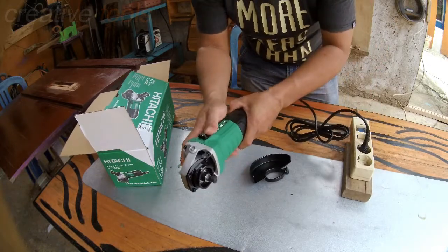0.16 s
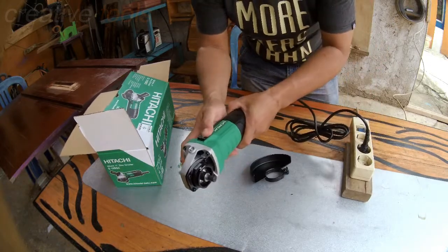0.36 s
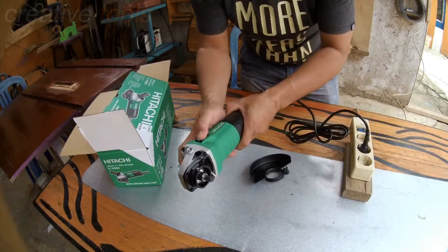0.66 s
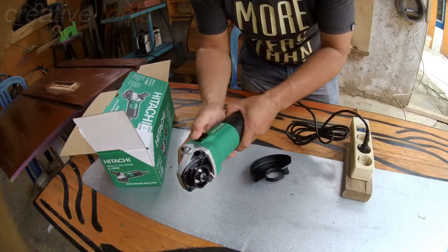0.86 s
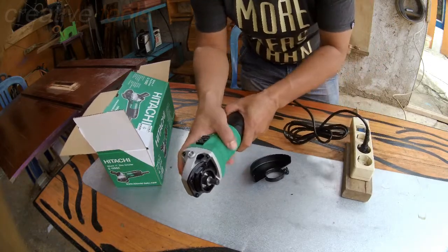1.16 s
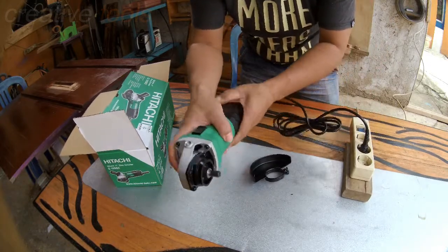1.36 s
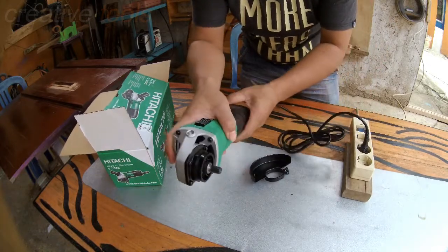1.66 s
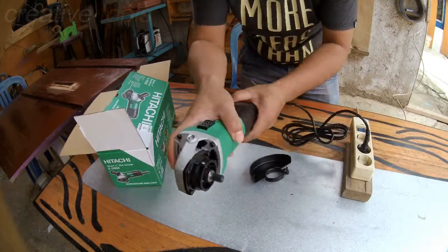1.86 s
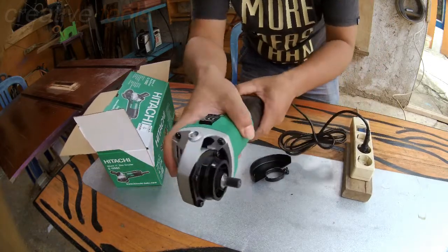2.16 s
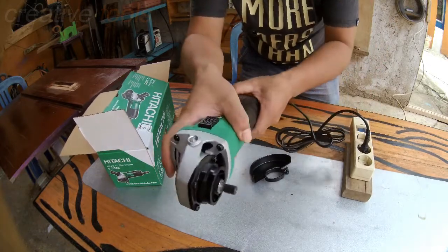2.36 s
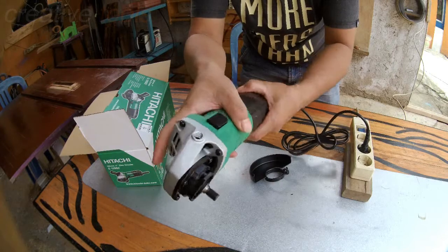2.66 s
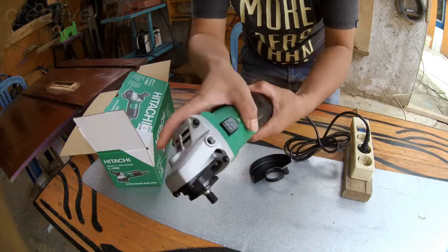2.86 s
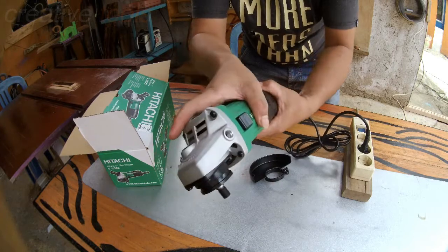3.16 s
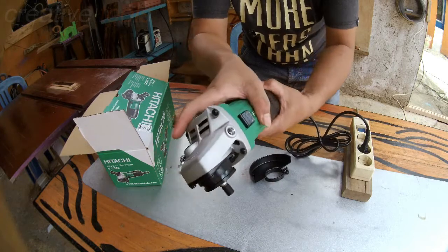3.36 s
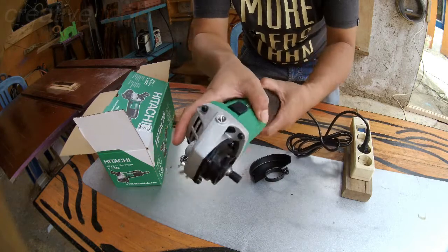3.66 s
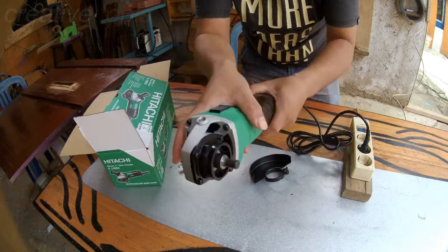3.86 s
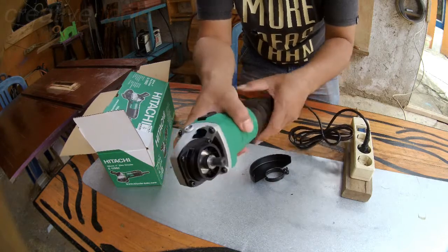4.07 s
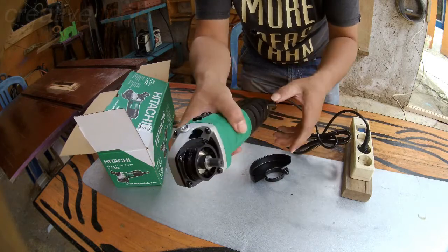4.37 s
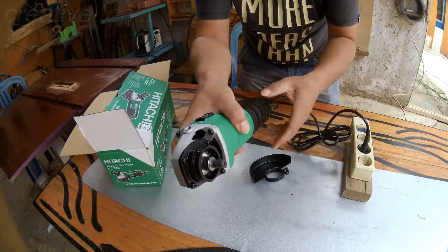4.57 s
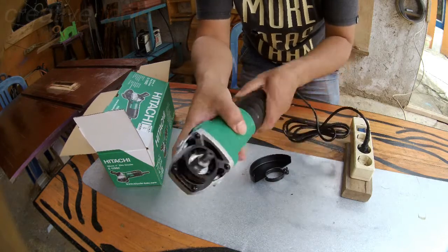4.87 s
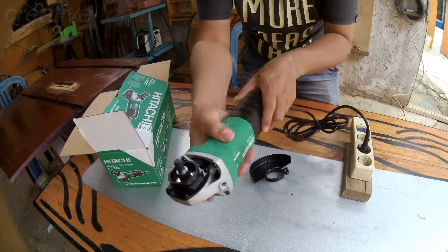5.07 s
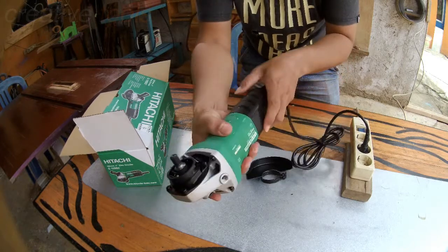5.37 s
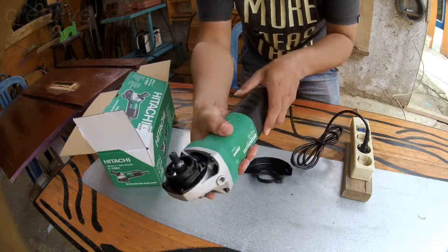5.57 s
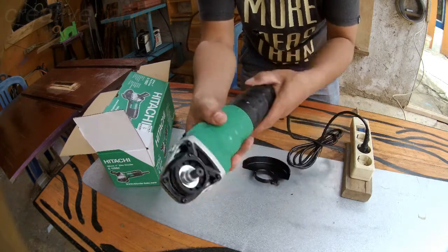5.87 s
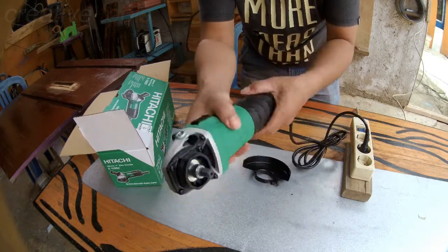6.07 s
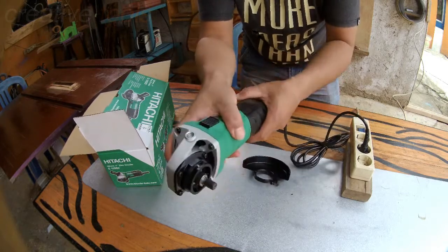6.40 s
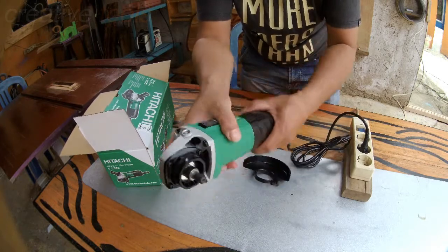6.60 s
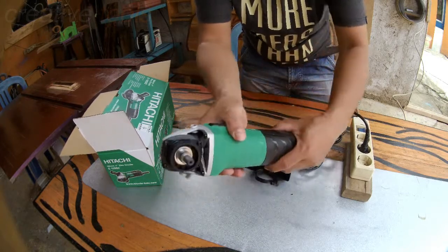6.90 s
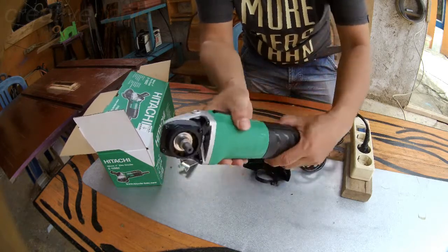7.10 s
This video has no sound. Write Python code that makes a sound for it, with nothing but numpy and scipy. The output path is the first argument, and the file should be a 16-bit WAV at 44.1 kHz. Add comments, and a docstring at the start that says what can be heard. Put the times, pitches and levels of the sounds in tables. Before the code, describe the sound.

A small electric angle grinder is switched on close to the microphone, with a click and a sharp gear rattle against a faint outdoor rumble. Its pitch rises, then holds as a mix of rushing fan, hum, hiss and thin whistle. As the tool is turned, the hiss sweeps and sometimes rings. Later, gusts from its vents thump on the microphone and briefly push down the continuing whine.

```python
"""Over a faint outdoor rumble a slide switch clicks, starting a small angle grinder with no disc close to one
microphone. The gears clash in time with the mains. As the motor speeds up, the fan rushes, the shaft
hums, gears and brushes hiss and the commutator whistles. The tool is turned in the hands over a table,
so reflections sweep the hiss and the hollow gear head rings at moments. From about 3 s the vents face
the microphone at times: cooling air buffets it and the gain ducks."""
import sys
import numpy as np
from scipy import signal
from scipy.fft import rfft, irfft
from scipy.io import wavfile
from scipy.ndimage import uniform_filter1d, map_coordinates

SR = 44100
rng = np.random.default_rng(int(sys.argv[2]) if len(sys.argv) > 2 else 0)


def persist_wave(psi):
    """Save psi, clipped to +-1, as 16-bit WAV."""
    counts = np.round(np.clip(psi, -1, 1) * 32767).astype(np.int16)
    wavfile.write(sys.argv[1], SR, np.atleast_2d(counts).T)


N = 319284
T = np.arange(N) / SR
ON_S, MAINS_HZ = .273, 50
FREE_HZ, SLOTS, BARS = 596.8, 12, 24  # armature: free-running rate, slots, commutator bars
HOLDER_HZ, HOLDER_WIDTH_HZ = 13550, 920  # resonance of the brush holders

# outdoor rumble spectrum (frequency [Hz], relative level [dB])
RUMBLE_SPECTRUM = [(18, -36), (30, -1), (65, 2.5), (211, -10), (337, -9), (404, -13), (538, -4.5),
                   (581, -26), (629, -7), (735, -3), (837, -19.5), (7240, -29.5), (15000, -35)]
# partials of a far hum (frequency [Hz], level before the dip [dB])
FAR_HUM = [(339, -53.5), (452, -70), (754, -83)]
# ticks of the slide switch (time [s], level [dB], decay time [s])
SWITCH_TICKS = [(0.115, -38.5, 0.0037), (0.243, -42, 0.0011), (.273, -17, 0.0034)]
# impact spectrum of gear teeth and switch (frequency [Hz], relative level [dB])
IMPACT_SPECTRUM = [(80, -30), (300, -24), (620, -10.5), (800, -15), (1230, -5.5), (1900, -12.5), (3100, -5),
                   (4400, 2.5), (5100, 2), (6200, -0.5), (7900, -12), (9200, -15), (12000, -29),
                   (15000, -30)]
# drift of the rotation rate (time [s], offset [Hz])
SPEED_DRIFT = [(2.4, 0), (3.1, 2), (4.1, 1.5), (5, -2), (5.4, -.3), (6.8, -.5), (7.2, -1.5)]
# modes of the cast gear head (frequency [Hz], bandwidth [Hz], relative level [dB])
HEAD_MODES = [(3600, 120, -2), (4070, 57, 3.5), (4490, 190, 3.5), (4760, 100, 7), (5100, 160, 6),
              (6440, 120, -16), (7670, 280, -17), (8850, 160, -6)]
# surges of gear clash while the motor pulls hard (start [s], end [s], relative level [dB])
CLASH_SURGES = [(.291, .318, -4), (.44, .465, -14.5)]
# relative levels sent to the microphone (time [s], fan [dB], gear case [dB], vents [dB], brushes [dB])
RADIATION = [(.55, -34, -19.5, -19.5, -18), (1.1, -35.5, -22, -21.5, -19), (2.6, -37, -22, -22.5, -18.5),
             (2.88, -31.5, -24, -23.5, -22.5), (3.13, -30.5, -21.5, -20, -22),
             (3.36, -28.5, -18.5, -16.5, -21), (3.68, -28, -21, -19, -23), (3.87, -31.5, -21, -17.5, -20),
             (4.0, -33, -23, -22, -21.5), (4.13, -29.5, -22, -21.5, -20), (4.85, -27.5, -20.5, -21.5, -19),
             (5.25, -26.5, -23.5, -23, -20.5), (5.75, -27.5, -22.5, -23, -19), (5.9, -27, -20.5, -24, -19),
             (6.3, -26, -21.5, -23, -19), (6.8, -27.5, -22, -24.5, -19), (7.0, -26, -19.7, -21, -20),
             (7.24, -28.5, -20.5, -20, -20.5)]
# spectra of those four sources (frequency [Hz], relative level [dB])
FAN_SPECTRUM = [(120, -28), (200, -23), (345, -20), (489, -14), (555, -15.5), (588, -10.5), (914, -11.5),
                (1090, -4), (1170, -4.5), (1470, -6.5), (1730, -4.5), (2720, -13), (3200, -13.5),
                (4160, -15), (7040, -120)]
GEAR_SPECTRUM = [(1410, -71), (2400, -14), (3000, -8), (3510, -4.5), (4250, -3.5), (4880, -0.5),
                 (6000, -5.5), (7800, -32), (13200, -120)]
VENT_SPECTRUM = [(3410, -30), (5800, 0), (7110, -1), (8040, 3.5), (8780, -7), (9300, -11.5), (12100, -41),
                 (20500, -120)]
BRUSH_SPECTRUM = [(6000, -10), (9000, -8), (9600, -4), (10300, 0.5), (11500, 1.5), (12000, 1.5),
                  (12500, -2.5), (13000, -12), (13600, -8), (14300, -19), (15300, -12.5), (16000, -25)]
# squeals of the brush holders (start [s], end [s], relative level [dB])
HOLDER_SQUEALS = [(3.82, 3.88, -29), (5.87, 5.94, -30), (6.7, 6.77, -28)]
# delays of the reflections (time [s], hands [ms], table [ms])
ECHO_DELAYS = [(1.05, 0.54, 0.46), (1.45, 0.45, 1.53), (2.05, .41, 1.54), (2.65, 0.38, .6),
               (3.2, 0.32, .68), (3.8, .32, 0.75), (4.05, 0.21, .6), (4.6, .2, 1.23), (5.7, 0.25, 0.78),
               (6.05, 0.2, 1.2), (6.25, .41, 0.96), (6.85, .31, .75)]
# base levels of the shaft tones (time [s], first order [dB], second order [dB], commutator [dB])
TONE_LEVELS = [(.38, -41, -41, -19), (.52, -52, -66, -22), (.85, -53.5, -55, -37), (1.4, -52.5, -46.5, -34),
               (2.0, -50, -44.5, -44), (2.5, -51, -60, -46), (3.1, -40, -55, -36), (3.8, -44.5, -58, -43),
               (4.15, -41.5, -39, -37), (4.8, -42, -39, -33), (5.1, -51, -35.5, -41),
               (5.45, -40.5, -32.5, -42), (5.8, -48, -37.5, -44), (6.2, -37.5, -36, -41),
               (6.65, -36.5, -35, -41), (6.82, -38, -37, -28), (7.0, -38, -32, -42)]
# narrow peak in the treble hiss (time [s], centre frequency [Hz], level [dB])
PEAK_PATH = [(.3, 11100, -30), (.65, 11250, -27), (1.3, 11200, -31), (2.1, 10550, -29), (2.6, 10400, -40),
             (3.0, 10050, -27.5), (3.6, 10000, -40), (4.7, 10400, -30), (5.5, 10400, -36),
             (6.75, 10500, -31), (7.2, 10200, -37)]
# overtones of the gear head's hollow (frequency [Hz], bandwidth per stage [Hz], relative level [dB])
HOLLOW_MODES = [(8180, 590, -3), (12000, 470, 0)]
# moments when that hollow faces the microphone (start [s], end [s], level [dB])
HOLLOW_FACING = [(2.72, 2.8, -25), (3.68, 3.9, -35), (5.16, 5.72, -24), (6.42, 6.54, -27)]
# gusts of cooling air on the microphone (start [s], end [s], level [dB])
GUSTS = [(2.95, 3.75, -22.5), (4.12, 4.22, -32), (4.44, 4.94, -27.5), (5.99, 6.22, -39), (6.3, 6.63, -46.5)]
# strongest buffets in that air (time [s], level [dB])
AIR_BUFFETS = [(2.959, -15), (3.04, -12), (3.067, -8), (3.09, -9.5), (3.125, -14.5), (3.19, -19),
               (3.25, -13.5), (3.395, -17), (3.502, -17), (3.543, -21), (3.577, -10), (3.625, -10.5),
               (3.679, -8), (3.756, -12), (4.205, -23), (4.442, -17.5), (4.525, -22.5), (4.733, -18.5),
               (4.83, -25.5), (4.93, -21), (6.203, -25)]
# spectrum of the eddies (frequency [Hz], relative level [dB])
EDDY_SPECTRUM = [(12, -43), (20, -27), (54, 3), (97, 0), (201, -9.5), (248, -15.5), (558, -26), (604, -48),
                 (634, -25.5), (900, -36), (1170, -35), (1980, -120)]


def undb(db):
    """Decibels to amplitude ratio."""
    return 10 ** (np.asarray(db) / 20)


def unit(x):
    """Normalisation to rms 1."""
    return x / np.sqrt(np.mean(x ** 2))


def curves(table):
    """Linear interpolation of each column in time."""
    times, *columns = np.transpose(table)
    return [np.interp(T, times, column) for column in columns]


def spells(table, attack_s, release_s):
    """Power summation of (start, end, dB) envelopes that swell, hold and decay."""
    gains = [undb(db) * np.exp(-np.maximum(start - T, 0) / attack_s - np.maximum(T - end, 0) / release_s)
             for start, end, db in table]
    return np.sqrt(np.sum(np.square(gains), axis=0))


def colour(x, spectrum):
    """Spectral shaping by (Hz, dB) points, cut off beyond their ends; rms 1."""
    hz, db = np.transpose(spectrum)
    log_hz = np.log(np.maximum(np.fft.rfftfreq(N, 1 / SR), 1))
    gain = undb(np.interp(log_hz, np.log(hz), db, left=-120, right=-120))
    return unit(irfft(rfft(x) * gain, N))


def ring(x, hz, width):
    """Second-order resonance, gain 1 at its centre."""
    return signal.lfilter(*signal.iirpeak(hz, hz / width, fs=SR), x)


def lowpass(hz):
    """Second-order low-pass filter sections."""
    return signal.butter(2, hz, fs=SR, output="sos")


def walk(rate):
    """Smooth random modulation, rms 1."""
    hold = int(SR / rate)
    steps = np.repeat(rng.standard_normal(N // hold + 1), hold)
    return unit(uniform_filter1d(uniform_filter1d(steps, hold), hold)[:N])


def contacts(rate, spread_db):
    """Impact noise: dense short bursts, each with a random strength."""
    burst = np.cumsum(rng.random(N) < rate / SR)
    return unit(rng.standard_normal(N) * undb(spread_db * rng.standard_normal(N))[burst])


def outdoors():
    """Ambient noise: a rumble and a wavering far hum, sinking from just before the motor starts."""
    hum = sum(undb(db + 1.4 * walk(17)) * np.sqrt(2) * np.sin(2 * np.pi * hz * T + .8 * walk(17))
              for hz, db in FAR_HUM)
    rumble = colour(rng.standard_normal(N), RUMBLE_SPECTRUM) * undb(-41.5)
    dip_db = np.interp(T, [.248, .262, .6], [0, -13, -19])
    return (rumble + hum) * undb(dip_db)


def switch():
    """Damped impacts: the plastic slider ticks as it moves and snaps home."""
    ticks = sum(undb(db) * np.exp(-np.abs(T - s) / decay) * (T > s) for s, db, decay in SWITCH_TICKS)
    return colour(rng.standard_normal(N), IMPACT_SPECTRUM) * ticks


def armature_hz():
    """Exponential approach to the free-running rate, in a quick and a slow stage, with slight drift."""
    since_on = np.maximum(T - ON_S, 0)
    shortfall_hz = 156.4 * np.exp(-since_on / .1536) + 229.7 * np.exp(-since_on / .4683)
    return FREE_HZ - shortfall_hz + curves(SPEED_DRIFT)[0]


def gear_head(x, modes_db):
    """Forced vibration: the metal head adds its modes to whatever shakes it."""
    return unit(x + undb(modes_db) * sum(undb(db) * ring(x, hz, width) for hz, width, db in HEAD_MODES))


def gear_clash(turns, current):
    """Amplitude modulation: inrush torque throws the teeth together on every half wave of the mains."""
    rattle = gear_head(colour(contacts(rate=2500, spread_db=1), IMPACT_SPECTRUM), modes_db=-3.5)
    whine = undb(-10.5 + 1.9 * walk(55)) * np.sin(2 * np.pi * SLOTS * turns + walk(158))
    whine *= np.interp(T, [.295, .335], [.2, 1])  # emerges once the teeth stop bouncing
    throb = np.interp(T, [.33, .39], [.42, .14])  # the current falls as the armature picks up speed
    surges = spells(CLASH_SURGES, attack_s=.009, release_s=.075)
    return (rattle + whine) * (1 + throb * current) * surges


def bars_match(speed, hz, width_hz):
    """Frequency coincidence of the commutator bar rate with a resonance, 0 to 1."""
    return np.exp(-((BARS * FREE_HZ * speed - hz) / width_hz) ** 2)


def holder_boost_db(speed):
    """Resonant gain as the bar rate meets the brush holders' own frequency."""
    return 3.5 * bars_match(speed, HOLDER_HZ, width_hz=500)


def running_hiss(speed, current):
    """Turbulence, impact and friction: fan, vents, gears and brushes grow louder with speed."""
    fan_db, gear_db, vent_db, brush_db = curves(RADIATION)
    sing_db = brush_db - 12.5 + holder_boost_db(speed) + walk(10)
    fan = colour(rng.standard_normal(N), FAN_SPECTRUM) * undb(fan_db + .5 * walk(25.05))
    gears = gear_head(colour(contacts(rate=1900, spread_db=-.8), GEAR_SPECTRUM), modes_db=-11)
    gears *= undb(gear_db + .08)
    vents = gear_head(colour(contacts(rate=1500, spread_db=1), VENT_SPECTRUM), modes_db=-15)
    vents *= undb(vent_db + .71 * walk(12))
    brushes = colour(contacts(rate=1900, spread_db=.4), BRUSH_SPECTRUM) * undb(brush_db - .5)
    holders = ring(ring(rng.standard_normal(N), HOLDER_HZ, HOLDER_WIDTH_HZ), HOLDER_HZ, HOLDER_WIDTH_HZ)
    holders = unit(holders) * np.hypot(undb(sing_db), spells(HOLDER_SQUEALS, .04, .04))
    # the armature shakes in its play
    chatter = undb(.66 * walk(70) + .33 * walk(600)) * (1 + .012 * current)
    return (fan + (gears + vents + brushes + holders) * chatter) * speed ** .64


def reflections(x):
    """Comb filtering: echoes off hands and table interfere, and the notches sweep as the tool turns."""
    hands_ms, table_ms = curves(ECHO_DELAYS)
    delayed = lambda ms: map_coordinates(x, [np.arange(N) - ms * SR / 1000], order=3)
    hands_db = np.interp(T, [1.05, 4.05], [0, 0]) + np.interp(hands_ms, [.2, .45], [-13, -21])
    return x + undb(hands_db) * delayed(hands_ms) + undb(-26) * delayed(table_ms)


def shaft_tones(turns, speed):
    """Harmonics of rotation: unbalance hums at two orders; slots and commutator bars whistle above."""
    first_db, second_db, bars_db = curves(TONE_LEVELS)
    angle = 2 * np.pi * turns + .035 * walk(25)
    angle += np.minimum(.2 * (1 - speed), .04) * walk(1200)  # the shaft judders until it is up to speed
    order = lambda n: np.sqrt(2) * np.sin(n * angle)
    hum = undb(first_db + 1.06 * walk(23)) * order(1) + undb(second_db + 2.6 * walk(45)) * order(2)
    bars = undb(bars_db + holder_boost_db(speed) + 1.5 * walk(17))
    bars *= np.minimum(speed / .85, 1) ** 4  # faint at low speed
    flare = undb(-20.5) * bars_match(speed, hz=7440, width_hz=650)  # a resonance of the housing
    slots = undb(-45 + 4 * walk(13))
    return hum + slots * order(SLOTS) + (bars + flare) * order(BARS)


def hiss_peak():
    """Narrow-band noise: one band of the air noise stands out and slides as the tool is turned."""
    hz, db = curves(PEAK_PATH)
    narrow = signal.sosfilt(lowpass(150), rng.standard_normal((2, N)))
    angle = 2 * np.pi * np.cumsum(hz) / SR
    return unit(narrow[0] * np.cos(angle) + narrow[1] * np.sin(angle)) * undb(db)


def hollow_ring():
    """Cavity resonance: air streaming over the hollow gear head excites its overtones."""
    facing = np.hypot(spells(HOLLOW_FACING, .063, .063), undb(-46))  # faint when turned away
    air = rng.standard_normal(N)
    modes = sum(undb(db) * ring(ring(air, hz, width), hz, width) for hz, width, db in HOLLOW_MODES)
    return unit(modes) * facing


def air_on_microphone():
    """Turbulent pressure: eddies from the vents buffet the microphone; gentler air is duller."""
    flow = spells(GUSTS, attack_s=.06, release_s=.052) * undb(3.3 * walk(35))
    buffets = sum(undb(db) * np.exp(-.5 * ((T - s) / .01) ** 2) for s, db in AIR_BUFFETS)
    wind = np.hypot(flow, buffets)
    eddies = colour(rng.standard_normal(N), EDDY_SPECTRUM)
    eddies /= np.sqrt(uniform_filter1d(eddies ** 2, size=1500))  # even out slow swells
    large = signal.sosfiltfilt(lowpass(108), eddies)
    small = (eddies - large) * np.minimum(wind / undb(-17.5), 1) ** .27
    return (large + small) * wind


def duck(x):
    """Automatic gain control: strong bass pushes the whole sound down for a moment."""
    threshold_db, slope, smoothing_s = -29.5, .21, .028
    bass = signal.sosfilt(lowpass(120), x[0])
    pole = np.exp(-1 / (smoothing_s * SR))
    power = signal.lfilter([1 - pole], [1, -pole], bass ** 2)
    return x * (1 + power / undb(threshold_db) ** 2) ** (-slope / 2)


def scene():
    """Superposition in two like channels; one shaft angle and the mains current drive the tool."""
    hz = armature_hz()
    turns, speed = np.cumsum(hz) / SR, hz / FREE_HZ
    current = -np.cos(2 * np.pi * 2 * MAINS_HZ * (T - ON_S))  # one pulse per half wave
    on = T > ON_S
    machinery = reflections((gear_clash(turns, current) + running_hiss(speed, current)) * on)
    tones = (hollow_ring() + hiss_peak() + shaft_tones(turns, speed)) * on
    return np.tile(machinery + tones + switch() + air_on_microphone() + outdoors(), (2, 1))


def record(dry):
    """Compression, clipping, band limiting: wind ducks the gain, the start overloads, the top is cut."""
    clipped = np.clip(duck(dry), -.93, .93)
    return signal.sosfilt(signal.ellip(12, .1, 100, 15450, fs=SR, output="sos"), clipped)


dry = scene()
out = record(dry)
persist_wave(out)
```